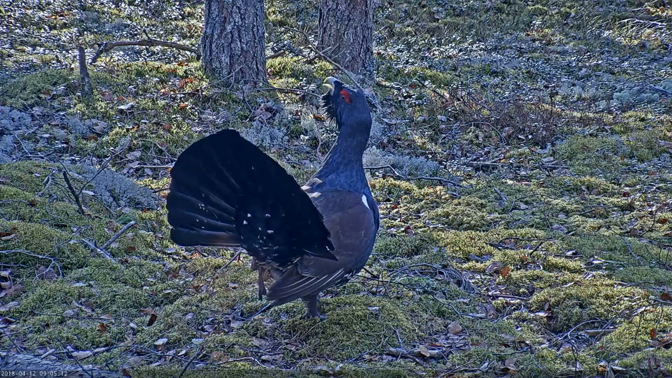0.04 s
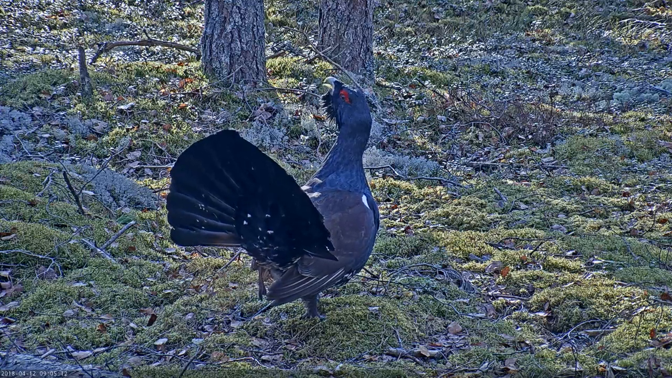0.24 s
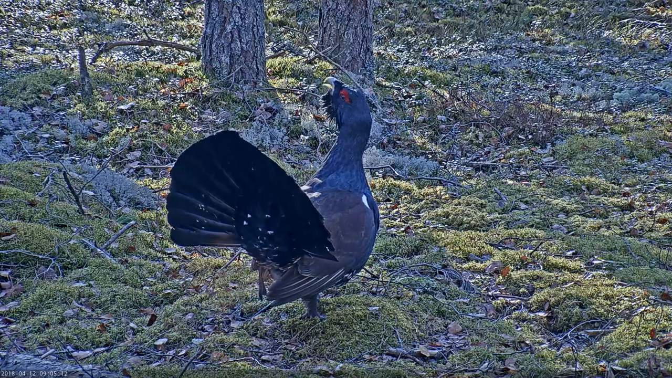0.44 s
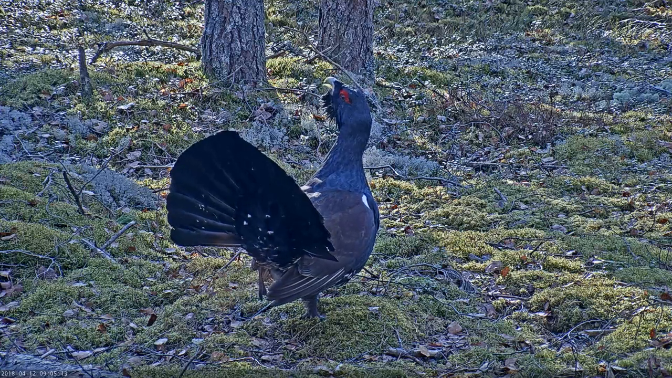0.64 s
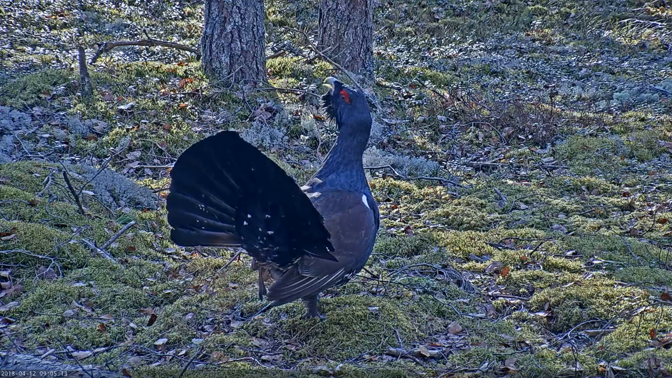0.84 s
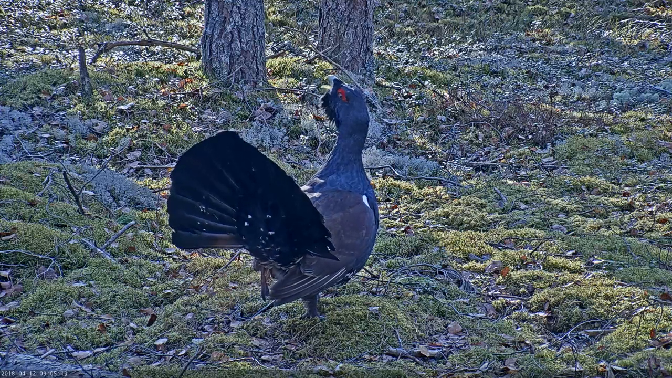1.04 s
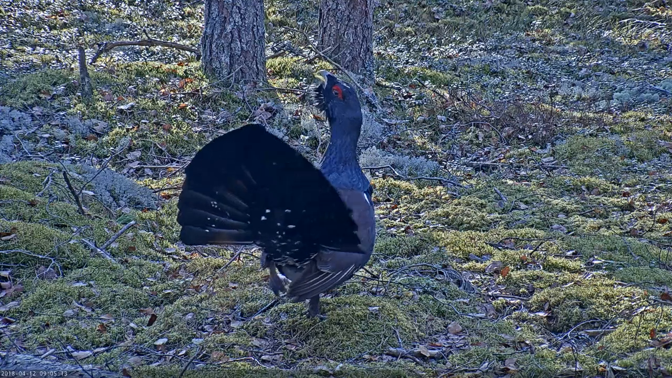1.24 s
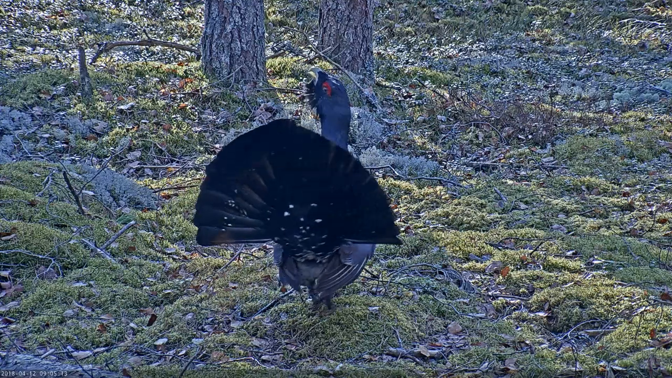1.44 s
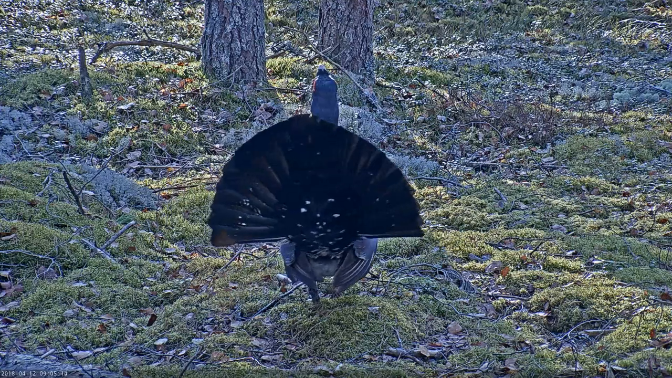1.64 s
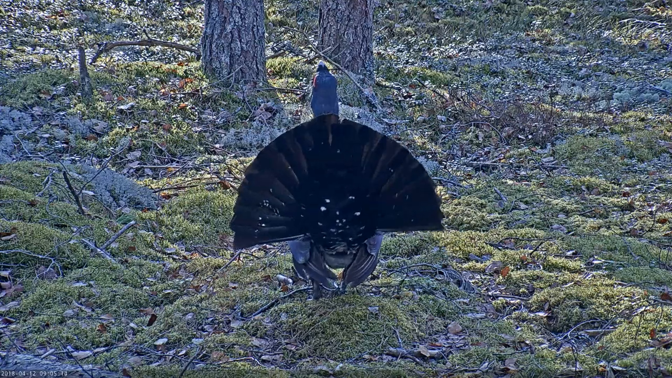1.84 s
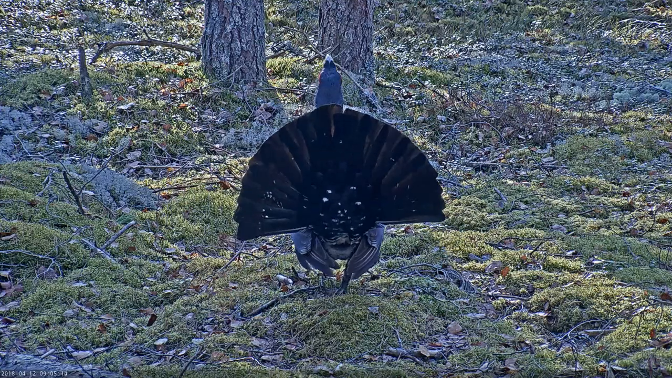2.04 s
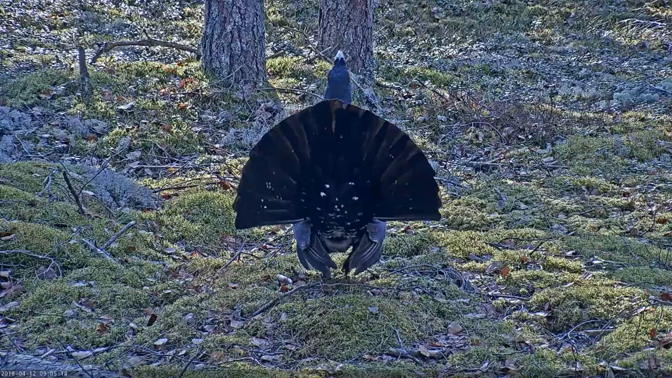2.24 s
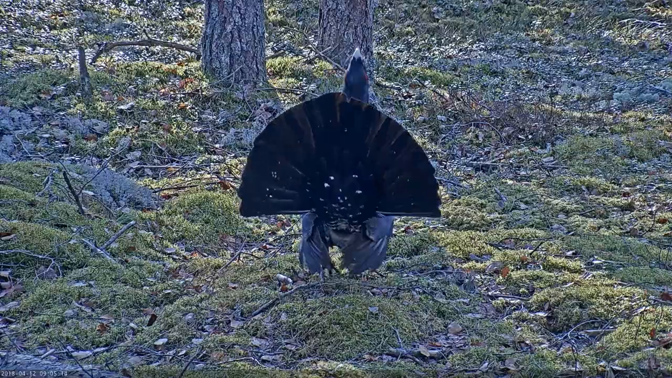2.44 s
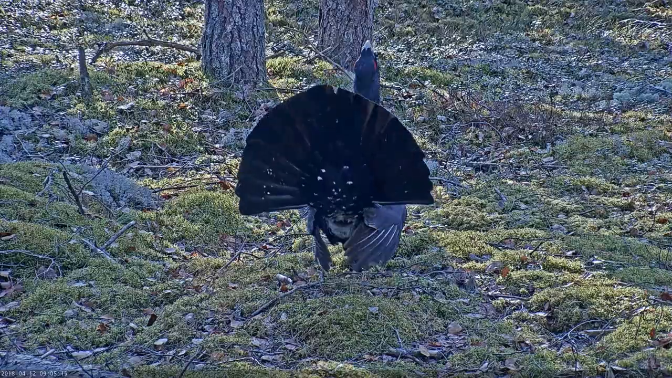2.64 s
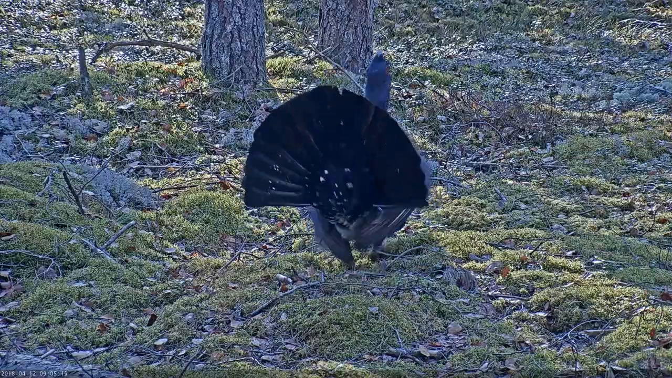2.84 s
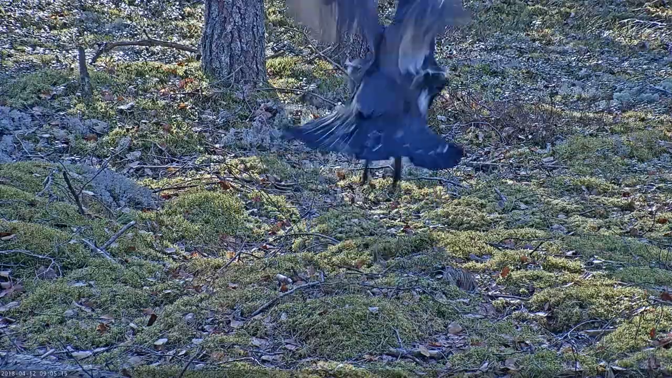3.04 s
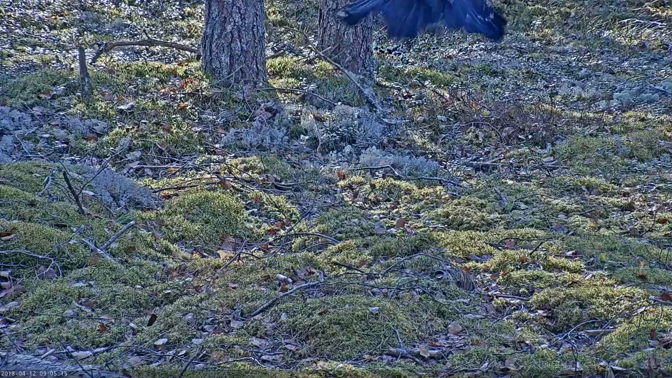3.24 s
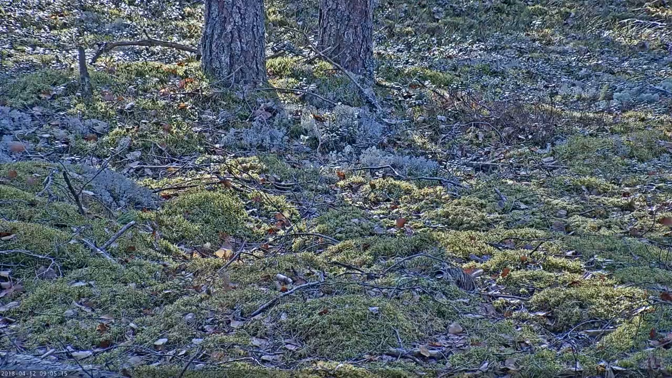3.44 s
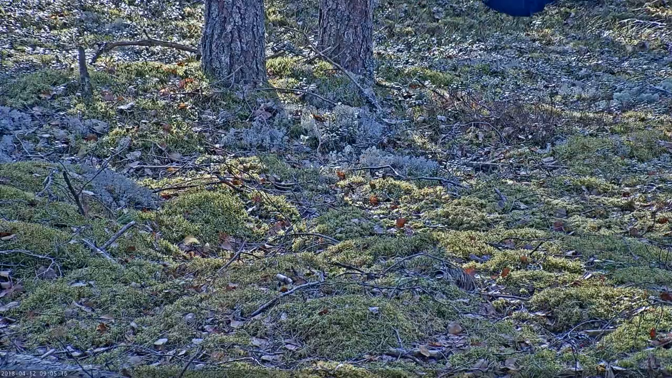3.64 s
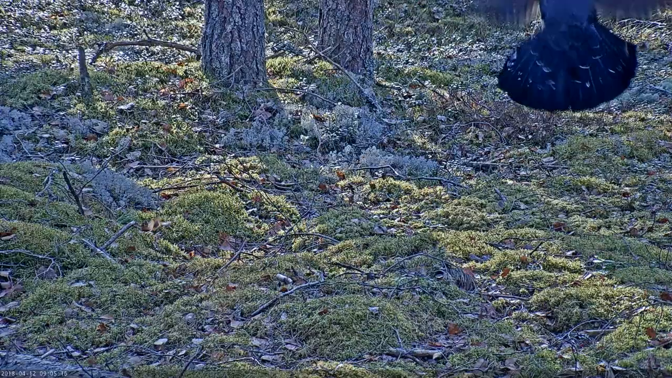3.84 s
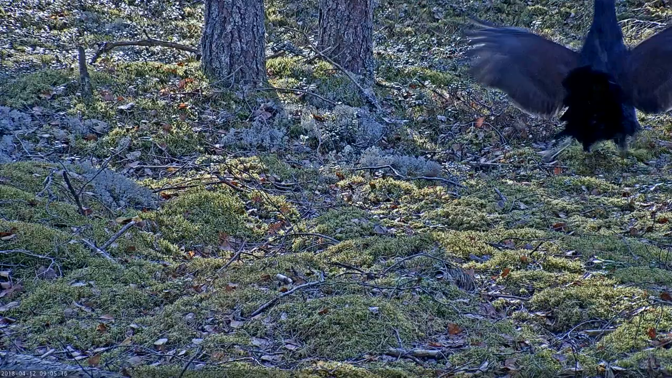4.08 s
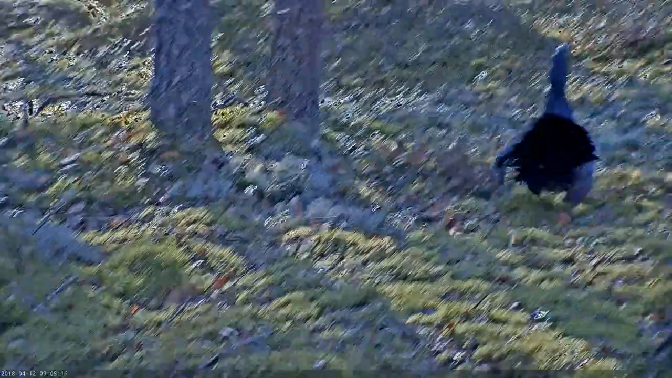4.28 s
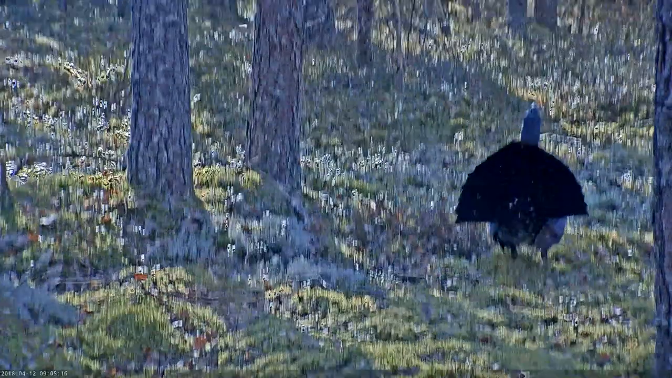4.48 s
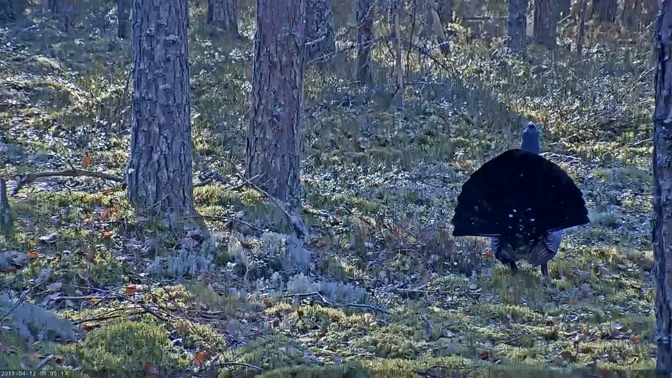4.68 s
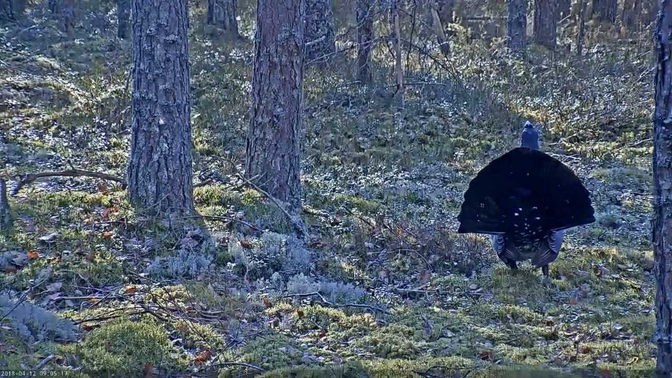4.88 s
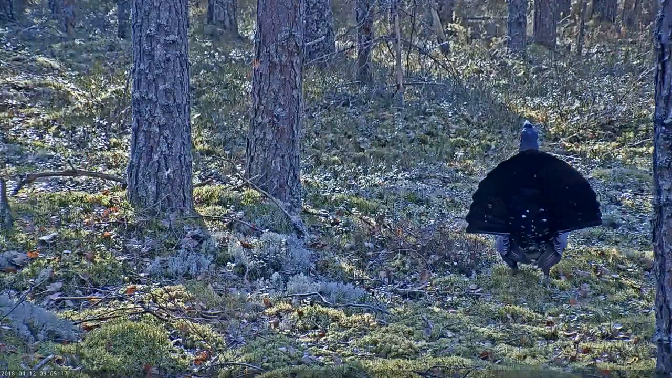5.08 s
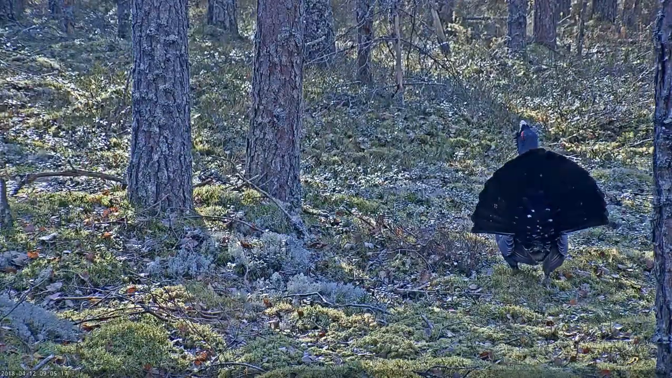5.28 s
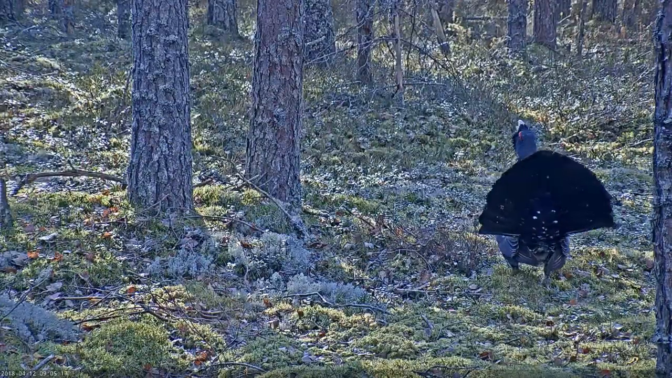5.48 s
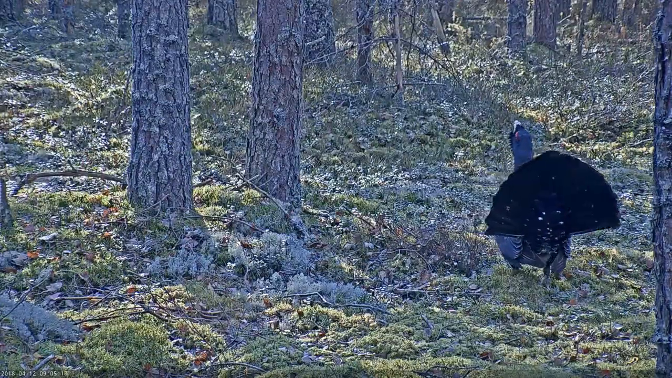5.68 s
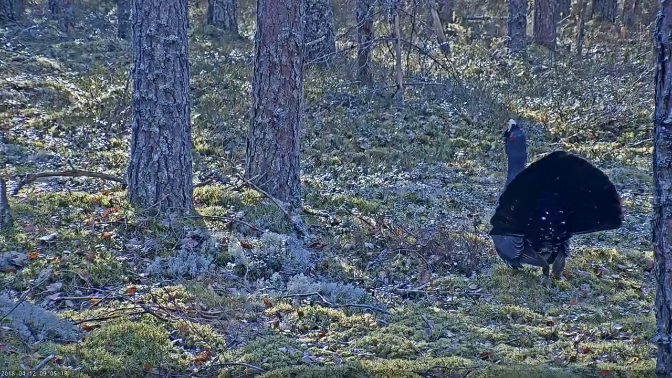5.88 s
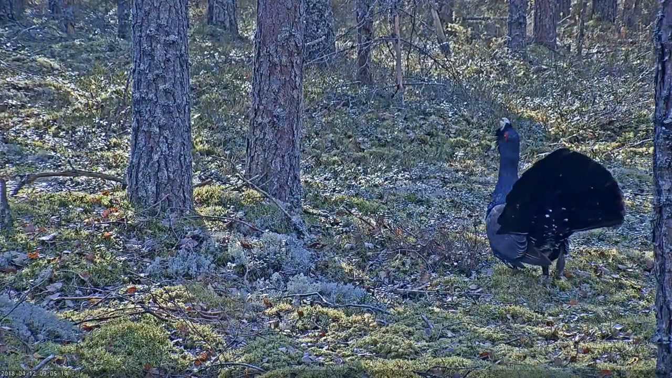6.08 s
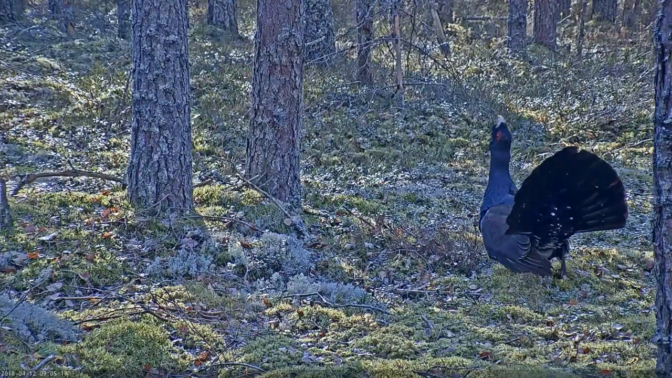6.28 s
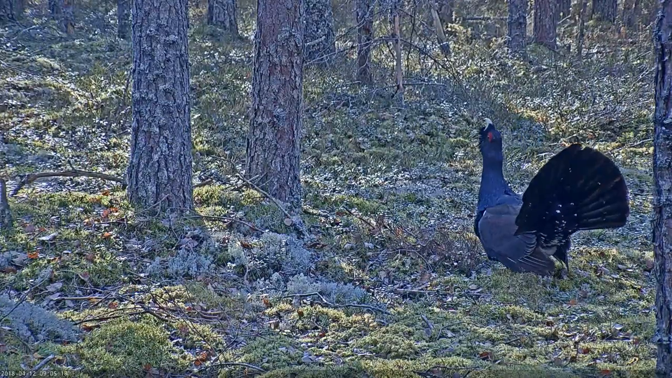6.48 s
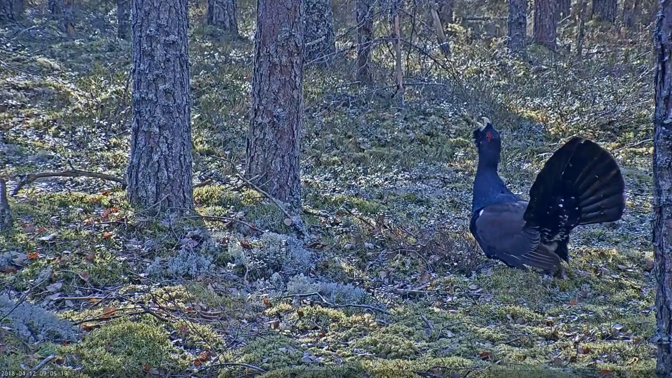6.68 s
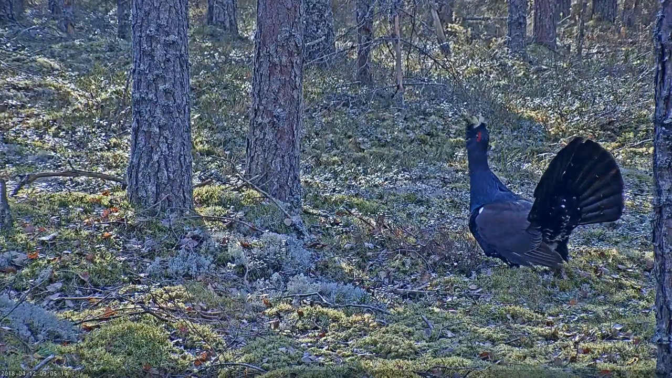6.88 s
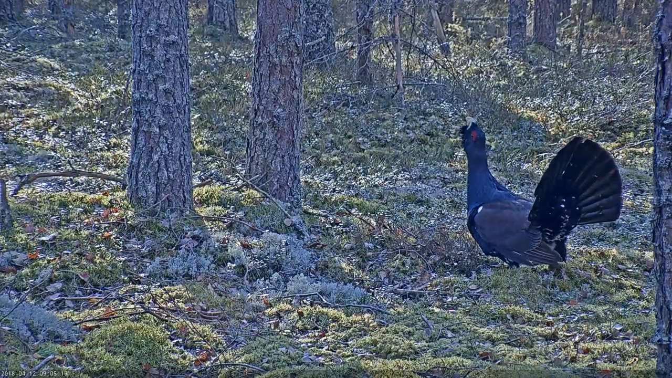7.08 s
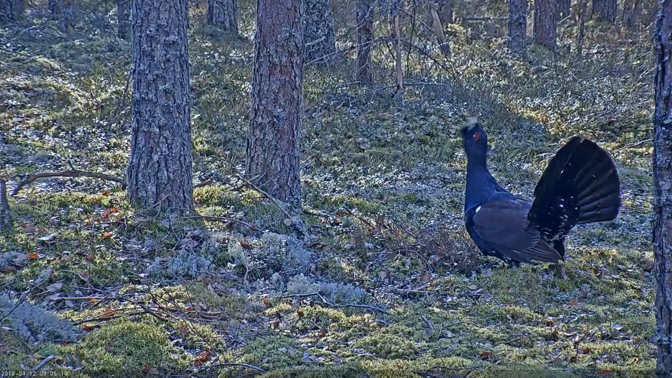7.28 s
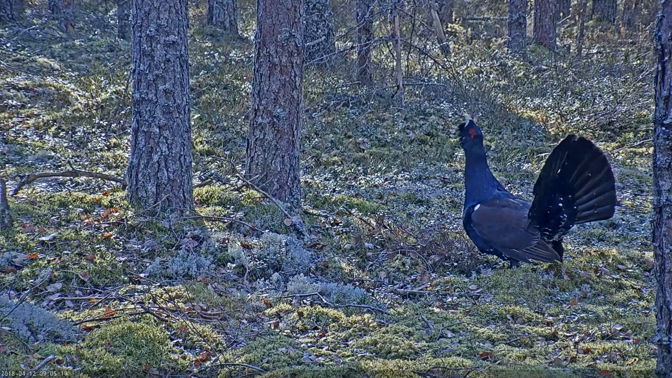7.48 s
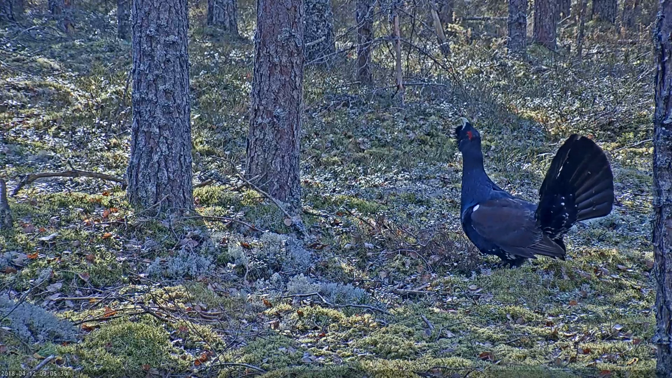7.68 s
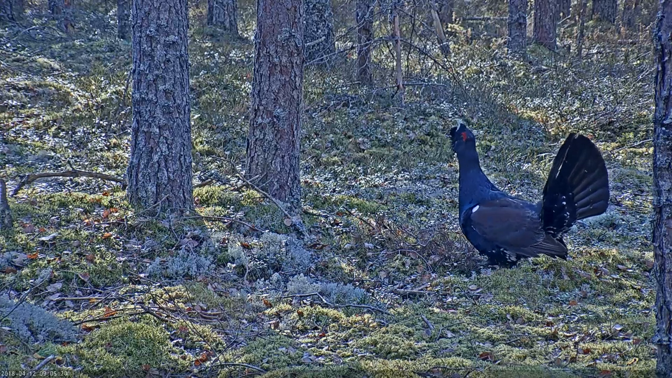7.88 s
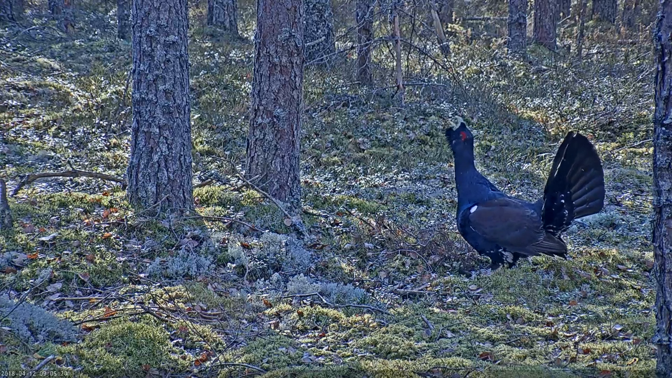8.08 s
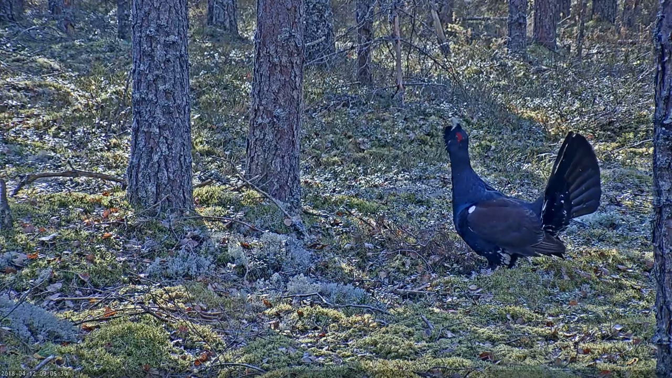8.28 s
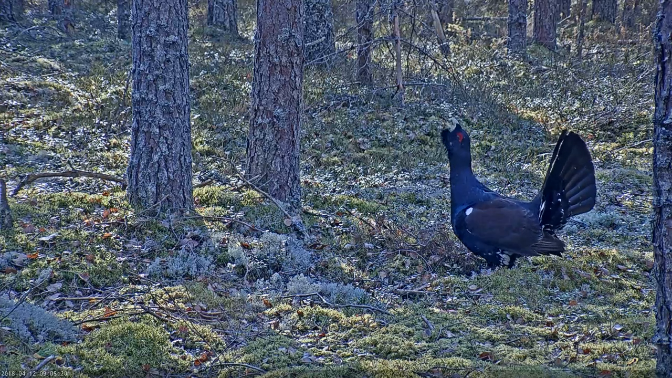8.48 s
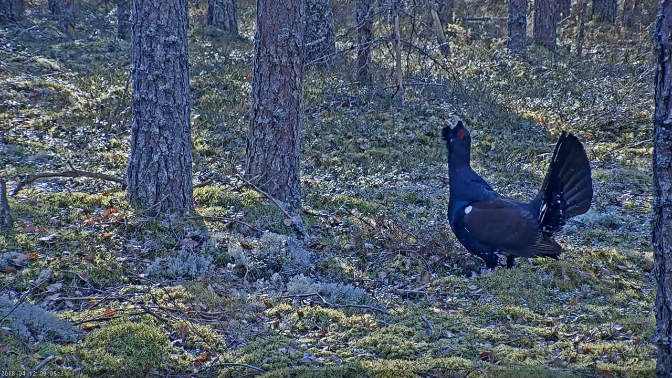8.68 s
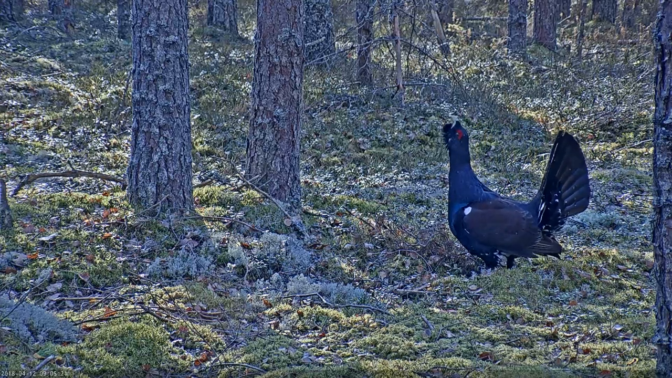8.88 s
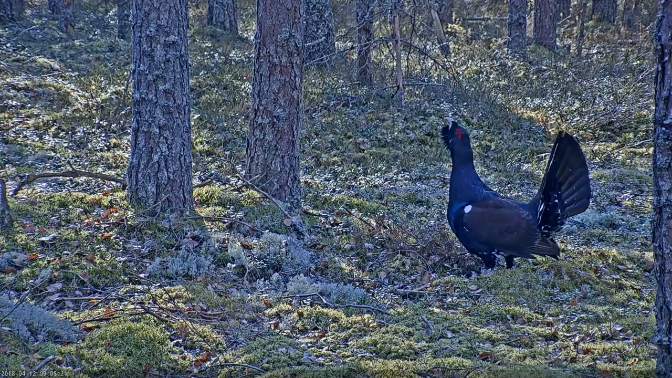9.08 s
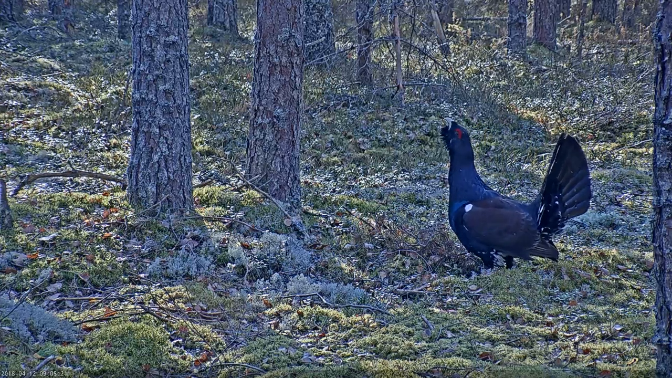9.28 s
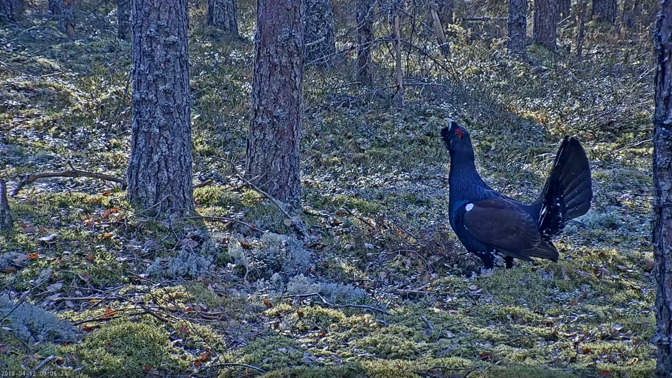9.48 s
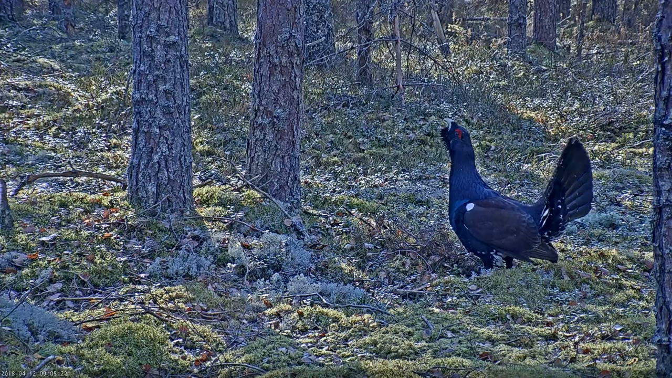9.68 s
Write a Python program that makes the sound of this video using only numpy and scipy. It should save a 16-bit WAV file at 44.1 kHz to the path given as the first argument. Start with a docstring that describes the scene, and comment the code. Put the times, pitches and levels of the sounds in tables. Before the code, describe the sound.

A large forest grouse displays on mossy ground near an outdoor microphone with light wind rumble. Sparse paired tongue-like clicks, woody and resonant, tighten into a rapid rattle and a cork-like pop. Wings burst into flapping claps with feathery hiss and deep gusts, followed by crackling litter. Clicks start again, speed up, and turn into wheezy, scratchy, chopped rasps to the end. Trunks return soft scattered echoes; distant small birds peep faintly.

```python
"""Open wood, light wind rumbling on the microphone, a far hush, and litter rustling under the feet.
A large forest grouse displays on moss close by: paired dry clicks speed up to a hollow pop, each click
one blow ringing throat, beak, windpipe and air sac; trunks answer with scattered echoes. Small birds
whistle far off as gliding tones. It leaps on clapping wings, noise bursts over slow pushes of air. A second
run of clicks leads to the scraping, hissing end of the song: chopped noise through sliding throat rings."""
import sys
import numpy as np
from scipy import signal
from scipy.fft import rfft, irfft, next_fast_len
from scipy.io import wavfile
from scipy.ndimage import uniform_filter1d

SR = 44100
rng = np.random.default_rng(int(sys.argv[2]) if len(sys.argv) > 2 else 0)


def inscribe(sig):
    """Save sig as 16-bit PCM at rate SR to the path in sys.argv[1].

    A 1-D sig is mono; a 2-D sig holds one channel per row.
    Samples are clipped to [-1, 1] before scaling.
    """
    pcm = np.round(np.clip(np.atleast_2d(sig).T, -1, 1) * 32767)
    wavfile.write(sys.argv[1], SR, pcm.astype(np.int16))


N = 428652

# Wind buffeting the microphone, before its gain: start_s, relative_level_db
WIND = [(0, -56.5), (.9, -60), (1.11, -49), (1.43, -61.5), (1.84, -48), (2.1, -62.5), (2.8, -50),
        (3.6, -59), (4.65, -53), (5.3, -59), (5.52, -49.5), (5.82, -58.5), (6.17, -51.5), (6.55, -58),
        (6.82, -51), (7.0, -58), (9.4, -56.5), (9.6, -56.5)]
# Colour of the far hush of the wood: frequency_hz, relative_density_db_per_hz
FOREST = [(59, -45.5), (100, -11), (201, -1.5), (268, -2.5), (332, -3.5), (458, -9.5), (655, -11.5),
          (769, -12.5), (970, -14), (1340, -23.5), (2550, -24), (7200, -45), (9360, -81), (15800, -120)]
FOREST_DB = -66.5
# Litter under the feet: start_s, level_db
RUSTLE = [(0.0, -86.5), (2.0, -84.5), (3.41, -67.5), (3.57, -73.5), (4.2, -66.5), (4.74, -82), (5.79, -86),
          (7.26, -77), (7.82, -81.5), (8.74, -79), (9.72, -87.5)]
# Twigs and leaves snapping: start_s, relative_level_db
SNAPS = [(1.6043, -57.5), (1.718, -57), (1.899, -55), (1.967, -54.5), (2.2772, -52.5), (2.416, -51.5),
         (2.4813, -45), (2.659, -49), (2.7636, -53.5), (2.9766, -57), (3.272, -47), (4.2423, -42.5),
         (4.358, -47), (4.3967, -47), (4.47, -54), (4.6008, -54), (4.65, -63), (4.677, -58), (5.563, -57.5),
         (6.9102, -61)]
# Dull footfalls: start_s, relative_level_db
THUDS = [(2.66, -49.5), (2.772, -52), (6.376, -55.5), (6.447, -51), (8.203, -48.5)]
SNAP_T60, THUD_T60 = 0.027, 0.14  # s
# Clicks: start_s, beak_opening (0-1), air_sac_relative_db, throat_hz, throat_db, beak_hz, beak_db
CLICKS = [(1.1749, 0.92, -56.5, 1512, -50.5, 2800, -65), (1.2922, 0, -58.5, 1275, -68, 2950, -61.5),
          (1.8174, 0.95, -59, 1278, -58, 3236, -57.5), (1.9089, 0.07, -60, 1302, -59.5, 2570, -68),
          (2.1886, 0.98, -61, 1240, -63, 3400, -55.5), (2.2559, 0, -63, 1310, -65.5, 2545, -63),
          (2.3915, 0.97, -65, 1263, -66, 3370, -58), (2.4513, 0, -64.5, 1256, -65, 2440, -63.5),
          (2.4982, 1, -71, 1300, -78, 2630, -68), (2.5532, 1, -71, 1200, -64, 3300, -57),
          (2.6, 0, -64, 1275, -60, 2596, -51), (5.1678, 0.88, -59.5, 1430, -55.5, 2095, -52),
          (5.301, 0, -62, 1407, -59, 2950, -56), (5.655, 1, -66, 1287, -59.5, 3416, -54.5),
          (5.7425, 0.06, -62.5, 1370, -59.5, 2620, -66), (5.9713, 1, -69, 1220, -65, 3530, -56),
          (6.0365, 0.05, -63, 1332, -61.5, 2640, -62.5), (6.1555, 0.9, -66, 1240, -73, 3580, -59.5),
          (6.2179, 0, -71, 1210, -66, 2530, -65), (6.2694, 0.77, -79, 1190, -77, 3600, -57),
          (6.315, 0.46, -76, 1190, -63, 3337, -54.5)]
# Windpipe modes with the throat at rest: shut_beak_hz, open_beak_hz, shut_relative_db, open_relative_db,
# throat_share (0-1, how far the throat drives it), t60_s
PIPE = [(1800, 1980, -3.5, -1, 0.55, 0.041), (2150, 2600, -12, -8.5, 0.7, 0.019),
        (2627, 2690, -1.5, -1, 0.5, 0.034), (2870, 2700, 0, -6.5, 0, .03),
        (3300, 3300, -13.5, -6, .05, 0.019), (3920, 3820, -19, -4.5, 0.2, 0.02),
        (5010, 4750, -12.5, -4.5, 0, 0.036), (5580, 6300, -7.5, -20, .05, 0.027)]
REST_HZ, STRETCH = 1271, 0.35  # throat ring at rest; the pipe modes follow it by this power
THROAT_T60, BEAK_T60 = 0.076, 0.037  # s
# Bounce off the moss: delay_s, level_db
GROUND = (.0037, -2)
# Late echoes among the trunks: frequency_hz, t60_s
TRUNKS = [(300, 0.72), (1500, 0.98), (3000, 0.9), (6000, 0.23)]
EARLY_DB, EARLY_T60 = 3.5, 0.23  # the nearest trunks answer louder and sooner; t60 in s
# Hollow pops: start_s, level_db, pitch_hz
POPS = [(2.772, -47.5, 794), (6.499, -52.5, 777), (6.838, -50, 797), (7.455, -56, 846)]
# Far whistles: start_s, length_s, start_hz, middle_hz, end_hz, level_db
WHISTLES = [(2.86, .085, 2500, 2320, 2210, -74.5), (4.55, 0.029, 3170, 2960, 2820, -73),
            (4.655, .04, 3520, 3500, 3420, -79), (6.544, 0.022, 3300, 3030, 2870, -76),
            (6.565, 0.08, 2550, 2360, 2050, -72.5), (8.065, .115, 6600, 7800, 6550, -79),
            (9.17, .11, 6840, 7100, 6200, -81)]
# The leap: start_s, feather_air_relative_db, downwash_on_microphone_relative_db
FLIGHT = [(2.95, -79, -63), (3.12, -63.5, -38), (3.42, -59, -32), (3.54, -63.5, -51), (3.72, -64, -46.5),
          (3.95, -59, -35), (4.17, -56, -35), (4.3, -62, -57), (4.6, -77, -75)]
# Wing strokes: start_s, relative_level_db, length_s, air_push_relative_db, feather_hiss_db (against the clap)
BEATS = [(3.179, -39.5, 0.18, -28.5, -13), (3.293, -36, 0.13, -26, -11.5), (3.408, -39, 0.11, -36, -13.5),
         (3.535, -42, 0.033, -43.5, -15), (3.683, -36, 0.025, -57, -10), (3.761, -44.5, 0.047, -42.5, -9.5),
         (3.806, -41.5, 0.096, -51, -16), (3.907, -42.5, 0.14, -35.5, -21), (3.957, -47.5, 0.11, -50, -14),
         (4.042, -37, 0.076, -33.5, -29), (4.152, -38, .05, -37.5, -26), (4.186, -44, 0.049, -48, -25),
         (4.276, -41.5, 0.022, -60, -18)]
# Colour of clap and feather air: frequency_hz, relative_density_db_per_hz
WING = [(120, -29.5), (200, -4), (481, -6), (983, -1), (1580, -10), (1910, -12.5), (2300, -12.5),
        (3310, -22.5), (4000, -22), (5200, -36), (8800, -120)]
# Scraping syllables: start_s, relative_level_db, length_s,
# low_ring_hz (near the end of the slide; a weaker ring lies below), brightness_db (higher rings, relative)
SCRAPES = [(6.489, -59, 0.024, 2630, 25), (6.7374, -56, 0.032, 1310, 3), (6.813, -52.5, 0.03, 2400, 6),
           (6.93, -59.5, 0.056, 1360, -1), (7.036, -61, 0.028, 1580, 6), (7.105, -54, .03, 2150, 8),
           (7.1965, -53, 0.035, 2050, 5), (7.233, -59.5, .041, 1810, 3), (7.377, -54, 0.084, 2370, 13),
           (7.427, -54.5, 0.042, 2130, 5), (7.6094, -54.5, 0.033, 2450, 24), (7.7, -59, .038, 2550, 2),
           (7.778, -52.5, 0.064, 1940, 4), (8.1103, -48.5, 0.058, 2370, 7.5), (8.206, -51, .028, 2110, 21),
           (8.3, -50, .039, 1900, -1.5), (8.339, -53.5, 0.061, 1910, 0), (8.5287, -49, 0.029, 2250, 0.5),
           (8.647, -51, 0.063, 2370, 17), (8.772, -51, 0.018, 1960, 6.5), (8.8645, -50, 0.018, 1850, 0.5),
           (8.9383, -50, 0.048, 1920, 1), (8.977, -54, 0.049, 1800, 5), (9.088, -57, 0.029, 2500, 3)]
# Upper rings of the scrape near the end of the slide: frequency_hz, resonance_width_hz, relative_level_db
THROAT = [(5680, 510, 4.5), (6690, 190, 3)]
# The middle ring sinks (Hz per Hz) as the low ring rises, and shares the brightness (dB per dB)
MIDDLE_HZ, MIDDLE_FALLS, MIDDLE_DB, MIDDLE_GROWS = 5470, 0.99, -2, 0.99
# Air leaking between syllables: start_s, relative_level_db
WHEEZE = [(6.6, -77), (7.87, -67.5), (8.21, -71.5), (8.96, -73.5), (9.4, -83)]
# Microphone response: frequency_hz, gain_db
MIC = [(7000, 0.5), (7500, -4.5), (8000, -15.5), (8400, -15.5), (8800, -19)]
TOP_HZ = 8820


def amp(db):
    """dB to gain."""
    return 10 ** (np.asarray(db) / 20)


def unit(x):
    """Scaled to rms 1."""
    return x / np.sqrt(np.mean(x ** 2) + 1e-20)


def along(points, hz):
    """Value at hz between (Hz, value) points on a log frequency axis."""
    f, v = np.transpose(points)
    return np.interp(np.log(hz + 1), np.log(f + 1), v)


def curves(rows):
    """One value per sample for each column after the time."""
    s, *cols = np.transpose(rows)
    return [np.interp(np.arange(N) / SR, s, c) for c in cols]


def filtered(x, response):
    """x shaped by a response of frequency."""
    m = next_fast_len(len(x) + 8192)
    return irfft(rfft(x, m) * response(np.fft.rfftfreq(m, 1 / SR)), m)[:len(x)]


def hush(response, size=N):
    """Coloured noise of rms 1."""
    return unit(filtered(rng.standard_normal(size), response))


def peak(f, hz, width):
    """One causal resonance."""
    return 1j * f * width / (hz * hz - f * f + 1j * f * width)


def ring(t, hz, db, t60, rise):
    """A dying sine with a soft start."""
    return amp(db - 60 * t / t60) * np.sin(2 * np.pi * hz * t) * (1 - np.exp(-t / rise))


def add(track, s, x):
    """Mix x into the track at second s."""
    part = track[round(s * SR):][:len(x)]
    part += x[:len(part)]


def aloft(db):
    """Gain of a level curve of the leap, silent on the ground."""
    s = np.arange(N) / SR
    return ((s > FLIGHT[0][0]) & (s < FLIGHT[-1][0])) * amp(db)


def air():
    """Wind and the wings' downwash, as lumpy low noise on the microphone, over the steady hush of the wood."""
    strength = np.hypot(amp(curves(WIND)[0]), aloft(curves(FLIGHT)[1]))
    lumps = strength * amp(3.6 * hush(lambda f: peak(f, 5.5, 6.7)))

    def rumble(f):
        """Low resonances of the buffeting, with the treble cut."""
        rings = peak(f, 21.7, 30.2) ** 2 + amp(-31.0) * peak(f, 75, 71) ** 2
        return rings / (1 + (f / 140) ** 6)
    buffet = filtered(lumps * rng.standard_normal(N), rumble)
    return amp(26.0) * buffet + amp(FOREST_DB) * hush(lambda f: amp(along(FOREST, f)))


def litter():
    """Noise bursts for snaps and dull footfalls over a hiss whose quick level swings make it crackle."""
    out, t = np.zeros(N), np.arange(SR // 8) / SR
    for s, db in SNAPS:
        hz = 6300 * rng.normal(1, .05)
        snap = hush(lambda f: peak(f, hz, 3200) ** 2, size=len(t))
        add(out, s, amp(db - 8.5 - 60 * t / SNAP_T60) * snap)
    t = np.arange(SR // 4) / SR
    for s, db in THUDS:
        thud = hush(lambda f: peak(f, 90, 83) ** 2, size=len(t))
        add(out, s, amp(db - 60 * t / THUD_T60) * (1 - np.exp(-t / 0.0046)) * thud)
    swings = unit(uniform_filter1d(rng.standard_normal(N), size=300))
    crackle = rng.standard_normal(N) * amp(2.8 * swings)
    hiss = unit(filtered(crackle, lambda f: peak(f, 5250, 5200) ** 2))
    return out + amp(curves(RUSTLE)[0]) * hiss


def clicks():
    """A snap of the tongue rings throat, beak, windpipe and air sac, then bounces off the moss."""
    out, t = np.zeros(N), np.arange(SR // 4) / SR
    rise, spread, spread_db = .0001, .015, 2  # start in s; chance in each mode's pitch (share) and level
    delay, bounce_db = GROUND
    shut_hz, open_hz, shut_db, open_db, share, t60 = np.transpose(PIPE)
    for s, opening, sac_db, throat_hz, throat_db, beak_hz, beak_db in CLICKS:
        opening = np.clip(opening, 0, 1)
        chance = rng.standard_normal((2, len(PIPE)))
        stretch = (throat_hz / REST_HZ) ** STRETCH
        hz = (shut_hz + opening * (open_hz - shut_hz)) * stretch * (1 + spread * chance[0])
        drive_db = beak_db + share * (throat_db - beak_db)
        db = shut_db + opening * (open_db - shut_db) + drive_db + spread_db * chance[1]
        modes = [(throat_hz, throat_db, THROAT_T60), (beak_hz, beak_db, BEAK_T60), *zip(hz, db, t60)]
        x = sum(ring(t, *mode, rise) for mode in modes)  # all start in step: a sharp first pulse
        flutter = hush(lambda f: peak(f, 110, 390), size=len(t))
        x *= 1 + 0.38 * flutter * (1 - np.exp(-t / 0.0038))  # soft walls make the rings flutter
        snap = (t == 0) + .1 * amp(-60 * t / .04) * rng.standard_normal(len(t))  # one blow, then scraping
        x += amp(24.5) * filtered(  # woody knock
            snap, lambda f: sum(amp(level) * peak(f, c, 600) for c, level, _ in modes[:3]))
        x += ring(t, 320 * rng.normal(1, 0.078), sac_db + 12.5, 0.036, 0.0028)  # the sac swells late
        x += ring(t, 740 * stretch, sac_db + 3.5, 0.05, 0.001)  # lowest ring of the pipe, fed by the sac
        x = filtered(x, lambda f: 1 / (1 + (f / 6500) ** 8))  # neck feathers take the edge off
        add(out, s, x)
        add(out, s + delay, amp(bounce_db) * x)
    return out


def trunks(x):
    """Scattered echoes, each frequency dying at its own speed; a new pattern for every short stretch."""
    out, step = np.zeros(N), SR // 5
    for start in range(0, N, step):
        hz, t, z = signal.stft(rng.standard_normal(SR // 2), SR, nperseg=256)
        late = amp(-60 * t / along(TRUNKS, hz)[:, None])
        early = amp(EARLY_DB - 60 * t / EARLY_T60)
        tail = signal.istft(z * (late + early), SR, nperseg=256)[1]
        echo = signal.fftconvolve(x[start:start + step], tail / np.linalg.norm(tail))
        add(out, start / SR + .008, echo)
    return out


def pops():
    """One hollow resonance rings as a quickly dying sine."""
    out, t = np.zeros(N), np.arange(SR // 4) / SR
    for s, db, hz in POPS:
        add(out, s, ring(t, hz, db, 0.043, 0.0011))
    return out


def whistles():
    """Thin gliding notes that swell and fade, roughened on their way through the wood."""
    out = np.zeros(N)
    for s, length, start_hz, middle_hz, end_hz, db in WHISTLES:
        u = np.arange(round(length * SR)) / (length * SR)
        bend = (2 * middle_hz - start_hz - end_hz) * 2 * u * (1 - u)
        hz = (1 - u) * start_hz + u * end_hz + bend
        add(out, s, amp(db) * np.sin(np.pi * u) ** 0.88 * np.sin(2 * np.pi * np.cumsum(hz) / SR))
    return out * (1 + .8 * hush(lambda f: peak(f, 90, 200) ** 2))


def feather_air():
    """Air through the feathers during the leap: wing-coloured noise with a fluttering level."""
    flutter = amp(2.6 * hush(lambda f: peak(f, 70, 170)))
    rush = hush(lambda f: amp(along(WING, f)))
    return aloft(curves(FLIGHT)[0]) * unit(flutter * rush)


def wings():
    """Each downstroke claps, hisses through the feathers and pushes a slow lump of air."""
    out, t = np.zeros(N), np.arange(SR // 4) / SR
    for s, db, length, push_db, hiss_db in BEATS:
        slap, swish = .8 * amp(-60 * t / .025), amp(-20 * t / length)
        stroke = (1 - np.exp(-t / .0012)) * (swish + slap)
        flutter = amp(4 * hush(lambda f: peak(f, 150, 300), size=len(t)))
        quills = flutter * rng.standard_normal(len(t))  # feathers slap one by one
        clap = unit(filtered(quills, lambda f: amp(along(WING, f))))
        hiss = hush(lambda f: peak(f, 4770, 3400) ** 2, size=len(t))
        add(out, s, amp(db - 8.5) * stroke * (clap + amp(hiss_db) * hiss))
        # The push slows towards 24 Hz as the vortex spreads
        turns = 2 * np.pi * (24 * t + 1.12 * (1 - np.exp(-t / 0.026)) + rng.random())
        push = np.sin(turns) + 0.26 * np.sin(2 * turns) + 0.065 * np.sin(3 * turns)
        add(out, s, amp(push_db + 2.0 - 60 * t / 0.55) * (1 - np.exp(-t / 0.012)) * push)
    return out


def scrapes():
    """Rough air through a throat that opens during each syllable, so its rings slide."""
    out, t = np.zeros(N), np.arange(SR // 8) / SR
    for s, db, length, low_hz, bright_db in SCRAPES:
        middle_hz = MIDDLE_HZ - MIDDLE_FALLS * low_hz
        middle_db = MIDDLE_DB + MIDDLE_GROWS * bright_db

        def throat(f):
            """Low, middle and upper rings."""
            low = peak(f, low_hz, 550) ** 2 + 0.78 * peak(f, 0.78 * low_hz, 180) ** 2
            middle = peak(f, middle_hz, 2000) ** 2
            upper = sum(amp(level) * peak(f, hz, w) ** 2 for hz, w, level in THROAT)
            upper = upper / (1 + (f / 7000) ** 16)
            return amp(6) * low + amp(middle_db) * middle + amp(bright_db) * upper
        jitter = hush(lambda f: peak(f, 60, 200), size=len(t))
        chops = np.cumsum(350 * np.abs(1 + 0.56 * jitter)) / SR
        # Folds chop the air unevenly; the stroke catches and slips
        breath = (1 + .6 * np.sin(2 * np.pi * chops)) * rng.standard_normal(len(t))
        catch = amp(1.8 * hush(lambda f: peak(f, 60, 100) ** 2, size=len(t)))
        u = np.clip(t / length, 0, 1)
        shut = filtered(breath, lambda f: throat(f * 1.086))  # rings lower than when wide
        wide = filtered(breath, lambda f: throat(f * 1.008))
        swell = np.sin(np.pi * u) ** 0.71
        add(out, s - .004, amp(db - 8.5) * swell * catch * unit((1 - u) * shut + u * wide))
    return out


def wheeze():
    """Air leaking between syllables: noise through one soft resonance."""
    s = np.arange(N) / SR
    singing = (s > WHEEZE[0][0]) & (s < WHEEZE[-1][0])
    return singing * amp(curves(WHEEZE)[0] - 7.5) * hush(lambda f: peak(f, 2520, 830) ** 2)


def scene():
    """All sources in the wood; the trunks answer voices and litter."""
    near = litter()
    song = clicks() + pops() + whistles()
    rasp = scrapes() + wheeze()
    echoes = trunks(amp(-6.5) * song + amp(-7.5) * rasp + amp(-4) * near)
    return (air() + near + song + echoes + feather_air() + wings() + rasp)[None]


def record(dry):
    """The microphone fades in the treble and keeps nothing above its band limit."""
    return filtered(dry[0], lambda f: amp(along(MIC, f)) * (f < TOP_HZ))[None]


dry = scene()
out = record(dry)
inscribe(out)
```